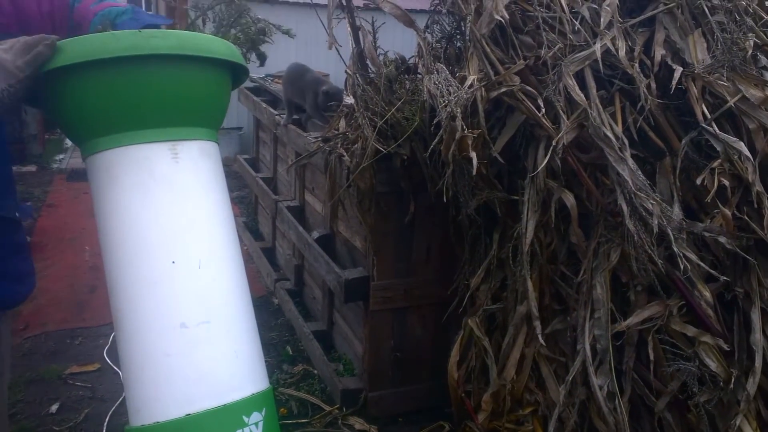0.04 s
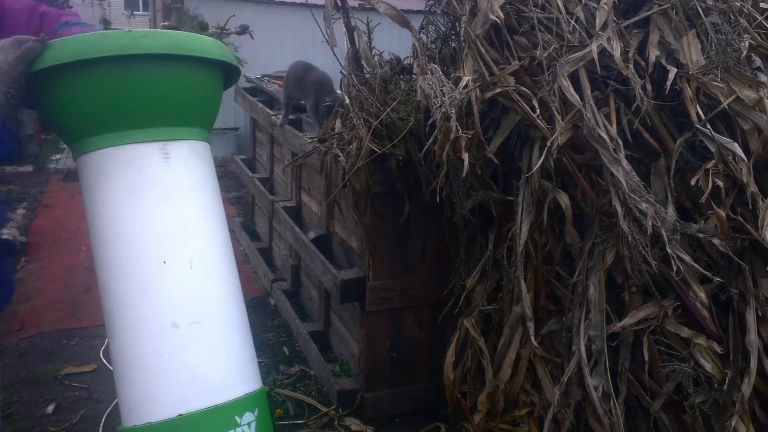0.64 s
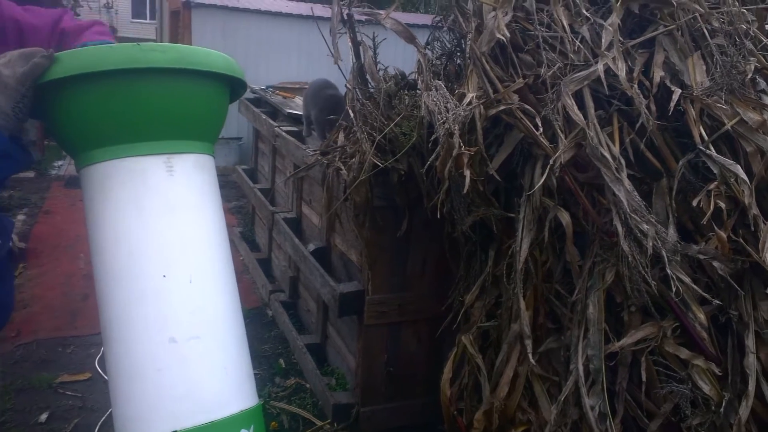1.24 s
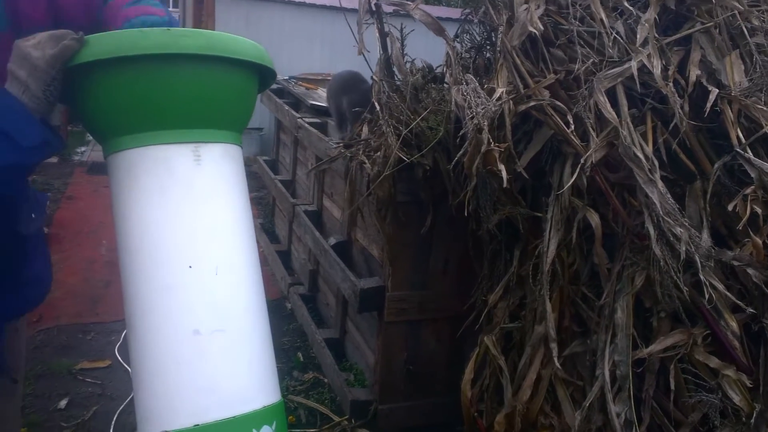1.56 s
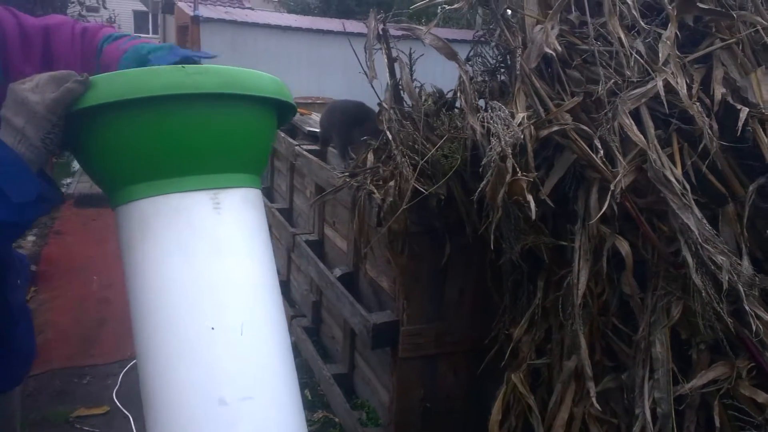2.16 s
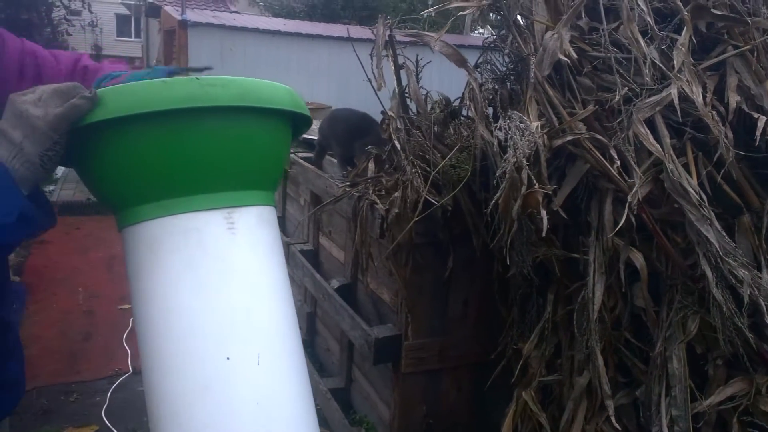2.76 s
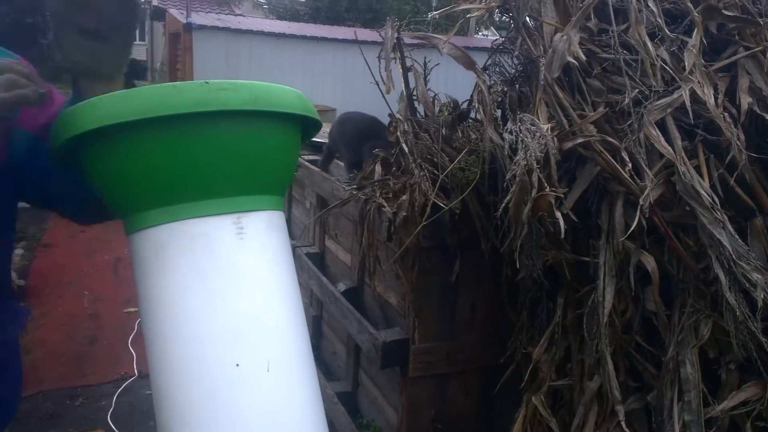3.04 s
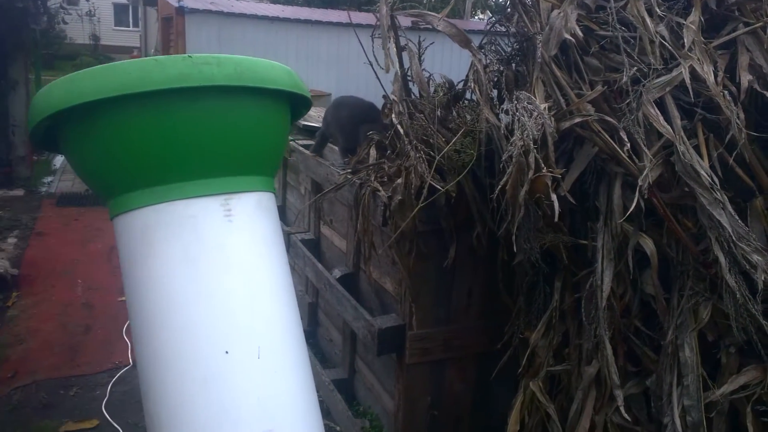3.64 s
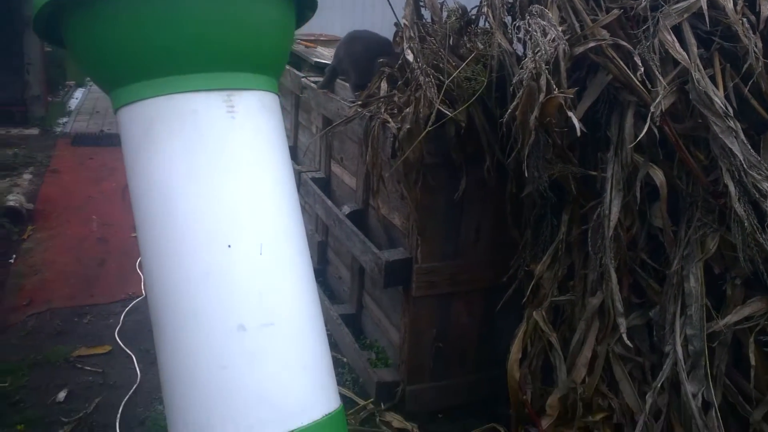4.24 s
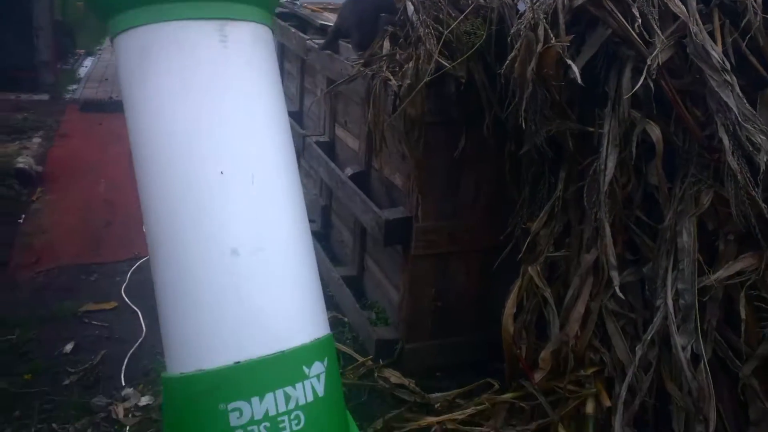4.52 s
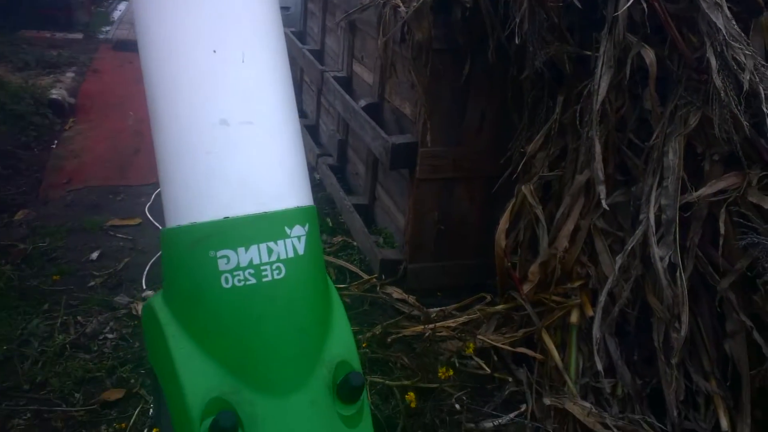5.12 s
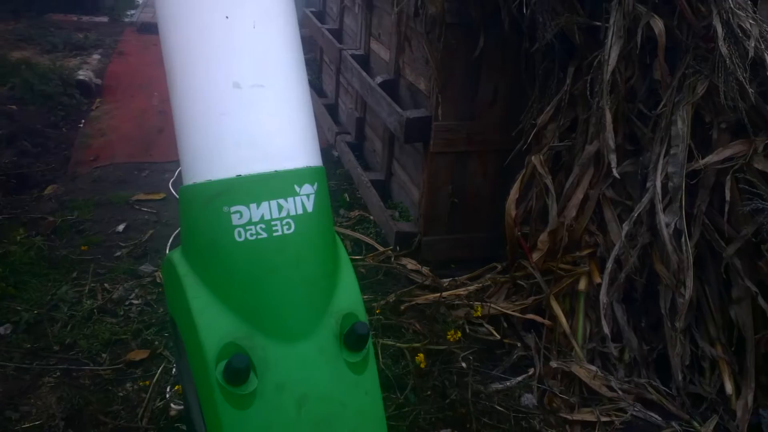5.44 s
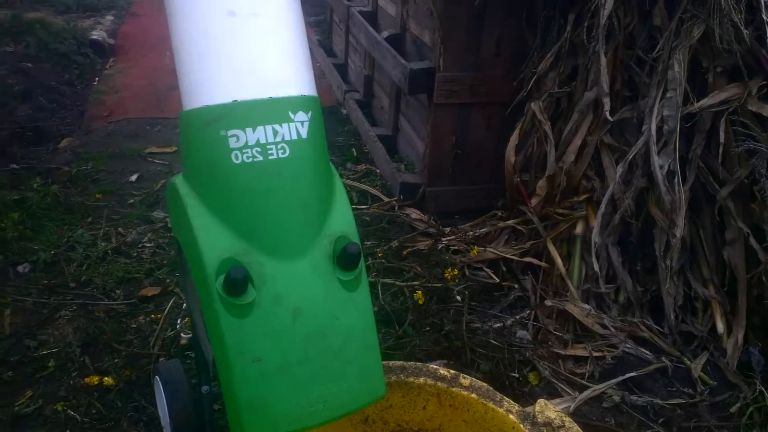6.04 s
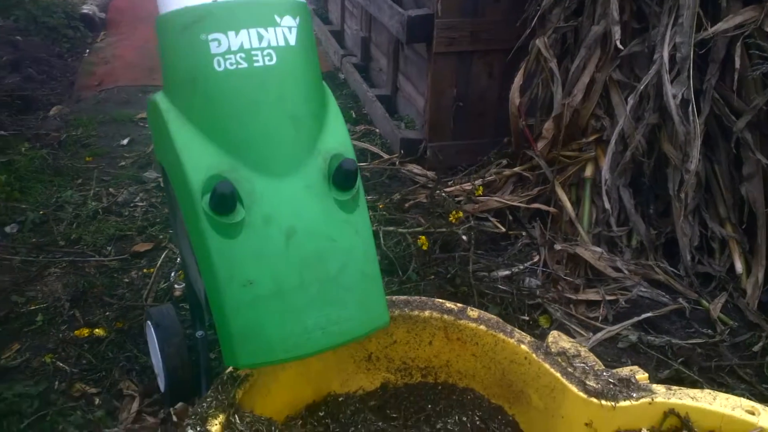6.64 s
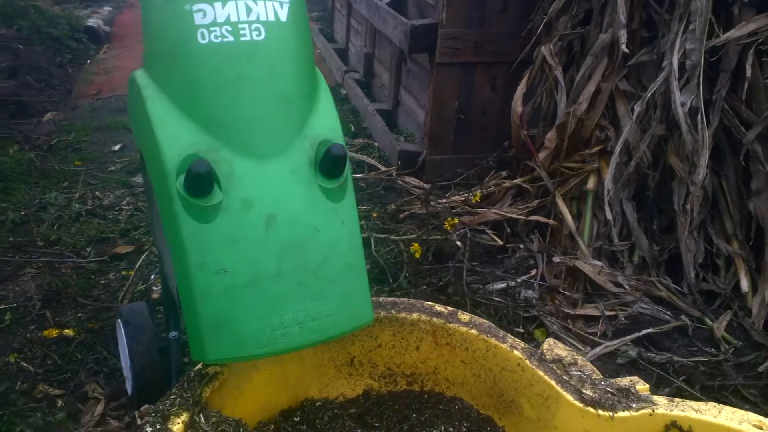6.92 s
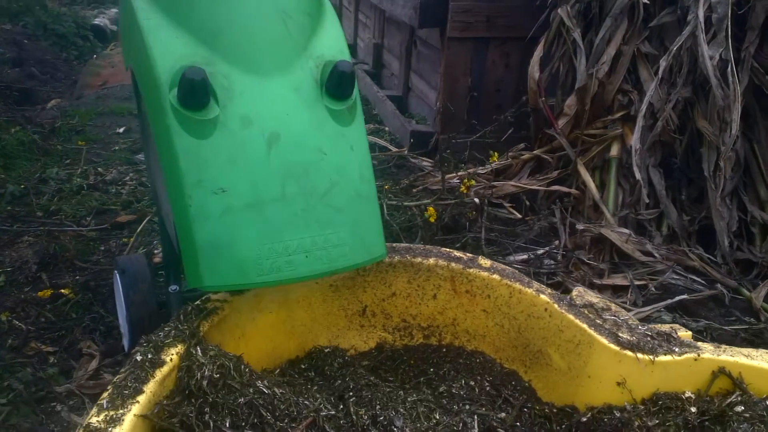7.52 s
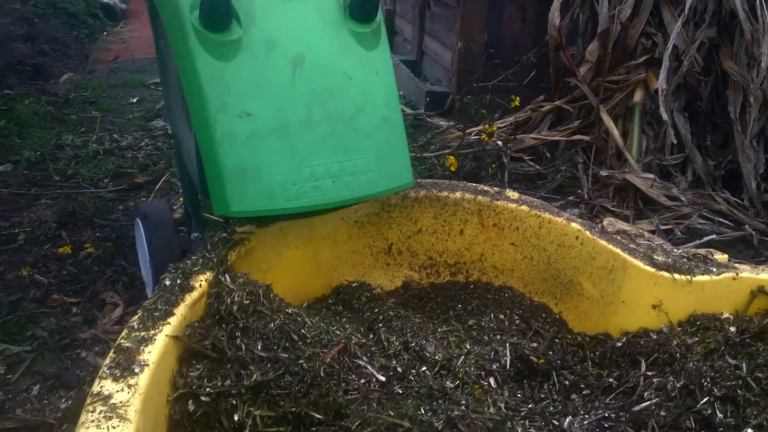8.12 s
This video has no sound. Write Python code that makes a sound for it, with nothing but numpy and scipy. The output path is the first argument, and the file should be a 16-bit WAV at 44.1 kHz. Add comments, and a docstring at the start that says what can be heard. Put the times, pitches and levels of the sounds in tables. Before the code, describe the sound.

An electric garden shredder idles in a yard, humming and blowing air while dry stalks tick lightly in its feed tube. After about two seconds the blades catch and it turns loud: fast hollow knocking, squeaking and crackling, with sharp snaps. The motor sags briefly on a thick bunch, then the chopping settles into a steadier buzz. The close microphone moves down toward the outlet and overloads on the loudest peaks.

```python
"""An electric garden shredder chops dry stalks in a yard, its two blades striking about 94 times a second.
Each pass knocks the housing, squeaks on the stalk and tears fibres. Bites into thick pieces are ragged
and slow the motor; a stalk resting on the blades buzzes evenly. For the first two seconds the machine
only idles, humming and blowing air while stalks tick in its feed tube. The close microphone moves
down to the outlet and overloads on the loudest peaks."""
import sys
import numpy as np
from scipy import signal
from scipy.fft import rfft, irfft
from scipy.io import wavfile
from scipy.ndimage import uniform_filter1d

SR = 44100
rng = np.random.default_rng(int(sys.argv[2]) if len(sys.argv) > 2 else 0)


def dump_mix(stems):
    """Bounce the given channels to the path in sys.argv[1] as a 16-bit WAV at rate SR."""
    frames = np.atleast_2d(stems).T  # one column per channel
    limited = np.clip(frames, -1, 1)  # hard clip at full scale
    pcm = np.round(limited * 32767).astype(np.int16)
    wavfile.write(sys.argv[1], SR, pcm)


N = 365148
TIME = np.arange(N) / SR
IDLE_HZ = 94.2  # blade passes a second with nothing to cut
LOW, MIDDLE, TREBLE = range(3)

# tone colour of air driven through the feed tube: (frequency [Hz], level [dB])
TUBE_COLOUR = [(40, -44), (110, -35), (200, -16), (330, -14), (520, -1), (680, -8), (830, 3.5), (980, -8),
               (1200, 4), (1750, -11), (3100, -3.5), (4800, -15), (10000, -20), (15000, -32)]
# notes the feed tube rings at: (frequency [Hz], width [Hz], boost [dB])
TUBE_MODES = [(1046, 55, 5.5), (2650, 440, 4.5), (3280, 330, 5.5), (6650, 150, 9)]
# tone colour of the cutting chamber heard through the feed tube: (frequency [Hz], level [dB])
CHAMBER_COLOUR = [(60, -47), (200, -27.5), (320, -14.5), (440, -8.5), (640, -7), (800, -6.5), (1400, -2.5),
                  (2100, -9.5), (2700, 1.5), (3350, -0.5), (4000, -10), (5000, -13), (8000, -16.5),
                  (15500, -29.5)]
# notes that ring on that same path: (frequency [Hz], width [Hz], boost [dB])
CHAMBER_MODES = [(361.5, 16, 8.5), (468.6, 33, 15.5), (745, 31, 7), (823, 68, 7.5), (1039.4, 39, 9.5),
                 (1194, 14, 3), (2460, 120, -2), (3475, 120, 2), (6700, 120, 8.5)]
# the microphone's move to the outlet, and the stalk's groan and scrape along the way:
# (time [s], outlet share [capped at 1], groan pitch [Hz], groan level [dB], scrape level [dB])
OUTLET_AND_STALK = [(2.2, 0, 1030, -7, -15), (3.4, 0.03, 1040, -26, -35), (3.7, 0.01, 800, -21, 10),
                    (4.0, 0, 751.5, -5, 1), (4.5, 0.04, 737, -1.5, 0.5), (4.9, 0.23, 750, -32, -1),
                    (5.5, 0.67, 750, -15, -1), (5.8, 0.75, 1040, -11, -12), (6.4, 0.96, 1060, -2, 0),
                    (6.7, 0.8, 800, -1, -1), (7.0, 0.98, 860, 1, -17), (7.5, 1.2, 846, 1, -25),
                    (7.8, 1.02, 924, 1, -17), (8.28, 0.8, 930, 2, -2)]


def undb(db):
    """Turn decibels into a gain."""
    return 10 ** (np.asarray(db) / 20)


def curves(table):
    """The columns of a table, joined by straight lines in time."""
    times, *columns = np.transpose(table)
    return [np.interp(TIME, times, column) for column in columns]


def unit(x):
    """Scale to an average (rms) level of 1; stereo goes by the mean of its sides."""
    return x / np.sqrt(np.mean(np.atleast_2d(x).mean(0) ** 2))


def drift(rate_hz):
    """Smooth random wandering with a spread near 1."""
    hold = int(SR / rate_hz)
    steps = np.repeat(rng.standard_normal(N // hold + 1), hold)
    return 1.279 * uniform_filter1d(uniform_filter1d(steps, hold), hold)[:N]


def pan(x, db):
    """Make the left side louder than the right by db."""
    return x * undb(np.array([[.5], [-.5]]) * db)


def band(x, register):
    """Keep the low, middle or treble part of a sound."""
    # limits of the three registers: (bottom [Hz], top [Hz])
    edges = [(30, 1700), (1700, 4500), (4500, 18000)]
    return signal.sosfilt(signal.butter(4, edges[register], "band", fs=SR, output="sos"), x)


def causal(gain):
    """A filter spectrum with this gain that rings only after a hit (minimum phase)."""
    cepstrum = irfft(np.log(gain))
    size = cepstrum.shape[-1]
    cepstrum[..., 1:] *= 2
    return np.exp(rfft(cepstrum[..., :size // 2], size))


def resonate(x, colour, modes, register, size=4096):
    """A hollow body gives one register of a sound its broad colour and ringing notes."""
    hz = np.maximum(np.arange(size // 2 + 1) * SR / size, 1)
    colour_hz, colour_db = np.transpose(colour)
    db = np.interp(np.log(hz), np.log(colour_hz), colour_db)
    db += sum(boost / (1 + (2 * (hz - centre) / width) ** 2) for centre, width, boost in modes)
    ring = band(irfft(causal(undb(db))), register)
    return signal.oaconvolve(x, ring / np.linalg.norm(ring))[:N]


def reflect(x, wet_db, t60, width, size=8192):
    """Echoes off tube, tub and ground fade 60 dB in t60 seconds; width makes the two sides differ."""
    mid, side = rng.standard_normal((2, size)) * np.exp(-np.log(1000) * TIME[:size] / t60)
    echoes = mid + width * side * np.array([[1], [-1]])
    echoes *= undb(wet_db) / np.linalg.norm(echoes[0])
    echoes[:, 0] += 1  # the direct sound
    paths = rfft(echoes)
    paths *= causal(uniform_filter1d(np.abs(paths) ** 2, size=6) ** -.5)  # keep the broad colour even
    return signal.oaconvolve(x[None], irfft(paths), axes=1)[:, :N]


def fibres(per_second, spread_db):
    """Fibres crack at random, most softly and a few loudly."""
    sizes = undb(spread_db * np.minimum(rng.exponential(size=N), 4))
    return unit(rng.standard_normal(N) * sizes * (rng.random(N) < per_second / SR))


def cracks(table, colour, modes, gain_db, low_db, treble_db, snap, snap_s=0.0021):
    """Each crack is a sharp break and a fading burst of splinters that ring the body around them."""
    drive = np.zeros((3, N))  # loudness over time in each register
    for time, db, low_tilt, treble_tilt, t60 in table:
        start = int(time * SR)
        age = TIME[:SR // 3][:N - start]
        fade = np.exp(-np.log(1000) * age / t60) + snap * np.exp(-age / snap_s)
        tilt_db = np.array([[low_tilt + low_db], [0], [treble_tilt + treble_db]])
        drive[:, start:start + len(age)] += undb(db + tilt_db) * fade
    splinters = fibres(12000, 1.1)
    low, middle, treble = (resonate(splinters * drive[k], colour, modes, k) for k in range(3))
    thud = reflect(low, wet_db=-7, t60=0.08, width=1)
    click = reflect(middle + treble, wet_db=2.8, t60=0.075, width=4.4)
    return pan(undb(gain_db) * (thud + click), 2.9)


def motor_hum(passes):
    """Motor and fan hum at multiples of the shaft's speed; one turn is two blade passes."""
    # motor and fan tones: (multiple of the shaft speed, level [dB])
    tones = [(4, -62), (6, -58), (8, -54), (10, -53.5), (11, -54), (12, -54), (13, -52), (14, -75),
             (18, -61), (20, -96), (24, -53), (26, -49), (31, -66)]
    shaft_angle = np.pi * passes + 0.014 * drift(3.5)
    hum = np.zeros(N)
    for multiple, db in tones:
        peak = np.sqrt(2) * undb(db + 1.3 * drift(6.6))
        hum += peak * np.sin(multiple * shaft_angle + 2 * np.pi * rng.random())
    return hum


def air_rush(passes):
    """The blade disc drives air up the tube, with a slight pulse on each pass."""
    rush = rng.standard_normal(N) * undb(2.04 * drift(14)) * (1 + 0.12 * np.sin(2 * np.pi * passes))
    low, middle, treble = (resonate(rush, TUBE_COLOUR, TUBE_MODES, k) for k in range(3))
    roar = undb(-35.5) * unit(reflect(low, wet_db=-0.44, t60=0.12, width=0.75))
    hiss = reflect(undb(-40) * middle + undb(-52.5) * treble, wet_db=1, t60=0.13, width=1)
    return roar + hiss


def stalk_taps():
    """Loose stalks tap and scrape the feed tube."""
    # taps: (time [s], relative level [dB], low tilt [dB], treble tilt [dB], fade time [s])
    taps = [(0.2223, -19, -14, -3, 0.045), (0.3176, -18, -16.5, -8, .1), (0.3863, -14.5, -20, -11, 0.32),
            (0.5296, -21, -26, -17, .14), (0.605, -23.5, -13, -9.5, 0.19), (0.744, -15, -27, -18, 0.09),
            (0.8164, -20, -17, -19, .13), (0.976, -16, -13, -15, .09), (1.162, -26, 8, -24, 0.32),
            (1.204, -18, -16, -12.5, .19), (1.2475, -18, -6, -19, .12), (1.3333, -17, -18, -12, 0.21),
            (1.4185, -10, -13, -7, .08), (1.4645, -20, -15, -21, 0.32), (1.5279, -14.5, -2, -14, 0.15),
            (1.5456, -11.5, -22, -15, 0.12), (1.5945, -13, -8, -14, 0.13), (1.722, -16.5, -25, -12, 0.1)]
    return cracks(taps, TUBE_COLOUR, TUBE_MODES, gain_db=-10.5, low_db=1.5, treble_db=0, snap=0.39)


def stalk_snaps(fade_s=0.044):
    """Stalks snap under the blades and ring the chamber."""
    # snaps: (time [s], relative level [dB], low tilt [dB], treble tilt [dB])
    snaps = [(2.117, -11.5, -6, -18), (2.152, -2.5, -1.5, -22), (2.1655, -2.5, -6, -26),
             (2.2272, -4, -15, -27), (2.2492, -6, 0, -25), (2.2683, 2, -19, -12), (2.371, -3, -10, -5),
             (2.497, 4, -9.5, -21), (2.5742, 3, -5.5, -13), (2.6157, -2, -16, -19), (2.9828, 2, -19, -12.5),
             (3.2261, -6.5, -2, -6), (3.262, 4, -24, -29), (3.3553, 1, -12, -18), (3.413, -3.5, -24, -15),
             (3.4458, -3.5, -17, -16), (3.47, -4, -27, -15), (3.562, 0.5, -11, -9), (3.6754, -4, -9, -14),
             (3.789, -1, -9, -15), (3.9596, -9, -8, -8), (4.035, 2.5, -8, -19), (5.223, 5, -12, -17),
             (5.4053, 5, -11, -20), (5.4143, -6, -2, -5)]
    rows = [(*row, fade_s) for row in snaps]
    return cracks(rows, CHAMBER_COLOUR, CHAMBER_MODES, gain_db=-10, low_db=2, treble_db=6.5, snap=0.89)


def blade_load(attack_s=0.016, release_s=0.024):
    """Bites into thick pieces briefly add loudness and raggedness to the steady feed."""
    # steady push of stalks on the blades: (time [s], knock [dB], squeak [dB], crackle [dB])
    feed = [(2.03, -35.5, -36.0, -49), (2.22, -22, -22, -38), (2.27, -23, -11.5, -20.5),
            (2.63, -18.5, -12, -21.5), (2.89, -19.0, -13.5, -27.5), (3.1, -23.5, -16.5, -29),
            (3.41, -27, -22.5, -31), (3.62, -20, -17, -26), (4.01, -15.5, -15.5, -22),
            (4.32, -21.5, -13.0, -25.5), (5.1, -18.5, -16.5, -26.5), (5.72, -22.5, -14.5, -30.5),
            (6.51, -18.5, -14.0, -31.5), (6.94, -18.5, -12, -25.5), (7.48, -17.5, -15, -26),
            (7.74, -22.5, -21, -27.5), (7.86, -19.0, -16.5, -22.5), (8.28, -17, -18.5, -30)]
    # fresh stalks tumble, then settle and rub evenly: (time [s], raggedness [0-1])
    settling = [(2.22, 0.93), (2.32, 0.46), (3.45, 0.71), (3.9, 0.4), (4.25, 0.05), (5.5, 0.02),
                (8.28, .02)]
    # bites: (time [s], length [s], added knock [dB], added tearing [dB], added raggedness [0-1])
    bites = [(2.087, 0.031, 7, 3, 1), (2.139, 0.048, 6, 4, 1), (2.244, 0.097, 9.5, 0.5, 0.29),
             (2.351, 0.048, 4.5, 1.5, 0.26), (2.439, 0.072, 2.5, 0, 0.6), (2.656, 0.033, 5, 0.5, 0.43),
             (2.737, 0.067, 6.5, 0, 0.21), (2.838, 0.042, -1.5, 1.5, 0), (2.928, 0.061, 5.5, 1, 0.18),
             (3.002, 0.034, 11, 3, 0.2), (3.499, 0.055, 8.5, 5.5, 0.44), (3.602, 0.045, 10.5, 5.5, 0.55),
             (3.69, 0.025, 7, 2.5, 0.45), (3.781, 0.043, 0, 1, 0.2), (3.887, 0.067, 3.0, 2.5, 0.36),
             (4.25, 0.071, 2, 1, 0.02), (4.4, 0.056, 3, 1.5, 0.02), (4.579, 0.097, 2, 1.5, 0.04),
             (4.945, 0.143, 4.5, 1.5, 0.62), (5.057, 0.026, 1.5, 3, 0.13), (5.121, 0.029, 6, 2, 0.33),
             (5.28, 0.019, 3, 4.5, 0.05), (6.568, 0.18, 2.5, 1.5, 0.02), (6.928, 0.046, 3.5, 0.5, 0.01),
             (7.14, 0.047, 3.5, 0, 0.12), (7.489, 0.075, 5, 1.5, 0.08), (7.628, 0.064, 5.5, 4.5, 0.09)]
    knock_db, squeak_db, crackle_db = curves(feed)
    ragged = curves(settling)[0]
    for start, length, push_db, tear_db, rough in bites:
        grip = np.clip(np.minimum((TIME - start) / attack_s, 1 + (start + length - TIME) / release_s), 0, 1)
        knock_db += push_db * grip
        squeak_db += tear_db * grip
        crackle_db += tear_db * grip
        ragged += rough * grip
    return knock_db, squeak_db, crackle_db, np.clip(ragged, 0, 1)


def follow_load(x, db, sides, first_stalk_s=2.03):
    """Set a cutting sound's level and side: silent until fed, dipping when the blades run free."""
    # the blades lose the stalk: (time [s], length [s], dip [dB])
    gaps = [(2.137, 0.036, -6), (2.216, 0.032, -1.5), (2.243, .012, -1.5), (2.595, 0.031, -14),
            (2.804, 0.041, -4), (3.102, .05, -5), (3.325, 0.042, -2), (3.396, .026, -5.5),
            (3.757, 0.02, -7.5), (3.979, 0.035, -3), (4.523, 0.072, -2.5), (5.115, 0.022, -1.5),
            (5.445, 0.033, -21), (7.218, 0.056, -2.5)]
    dip_db = sum(depth * np.exp(-(2 * (TIME - time) / length) ** 4) for time, length, depth in gaps)
    fed = np.interp(TIME, [first_stalk_s, first_stalk_s + 0.021], [0, 1])
    power = uniform_filter1d(x.mean(0) ** 2, round(3 * SR / IDLE_HZ))  # over about three passes
    return pan(x * fed * undb(db + dip_db) / np.sqrt(power + 1e-9), curves(sides)[0])


def stalk_squeak(age, force, pitch_hz, swell_s, glide):
    """The blade drags over the stalk: a short rising tone swells and dies within each pass."""
    t = age - 2 * swell_s
    swell = np.exp(-(t / swell_s) ** 2) * np.tanh(2 * age / swell_s)
    return unit(force * swell * np.sin(2 * np.pi * pitch_hz * t * (1 + glide * t)))


def shrill_scrape(tearing, db, pitch_hz=6620):
    """Dry stalk skin scraping on steel sings in a narrow band."""
    scrape = signal.lfilter(*signal.iirpeak(pitch_hz, 13, fs=SR), tearing * fibres(6000, 3.4))
    return undb(db + 2 * drift(13)) * unit(band(scrape, TREBLE))


def chamber(blows, torn, ragged, outlet, register, chips):
    """Blows, torn fibres and loose chips ring the chamber, heard through feed tube and outlet."""
    # tone colour of the chamber heard through the outlet: (frequency [Hz], level [dB])
    outlet_colour = [(90, -54), (270, -28.5), (350, -12), (520, -0.5), (800, -1.5), (1250, 0), (1500, -9),
                     (1900, -6.5), (2350, -3.5), (3250, 0), (3900, -8.5), (5300, -19), (9500, -21.5),
                     (15500, -41)]
    # notes the outlet rings at: (frequency [Hz], width [Hz], boost [dB])
    outlet_modes = [(381, 19, 9), (470, 26, 8), (644.4, 49, 2), (804, 42.9, 7), (850, 40, 2.5),
                    (1012.6, 23, 4), (1930, 160, 0.5), (2334, 46, 10), (2534, 31, 10), (3160, 99, -10),
                    (3243, 66, 6.5), (4130, 120, 5)]
    drive = np.sqrt(1 - ragged) * blows + np.sqrt(ragged + chips) * unit(torn)
    via_tube = resonate(drive, CHAMBER_COLOUR, CHAMBER_MODES, register)
    via_outlet = resonate(drive, outlet_colour, outlet_modes, register)
    share = np.clip(outlet, 0, 1)
    return (1 - share) * via_tube + share * via_outlet


def strikes(passes, force):
    """One click each time the pass count reaches a whole number, shared between two samples."""
    place = np.interp(np.arange(1, int(passes[-1])), passes, np.arange(N))
    i = np.minimum(place.astype(int), N - 2)
    late = place - i
    return np.bincount(i, force[i] * (1 - late), N) + np.bincount(i + 1, force[i] * late, N)


def blade_blows(passes, rate_hz, ragged, uneven_db=3.0, blade_db=1.47, bounce=0.48, slip=0.0463):
    """The blades hit a bouncing stalk; the more ragged the feed, the less alike the passes are."""
    contact = np.maximum(passes + slip * ragged * drift(60), 0)
    count = contact.astype(int)
    age = (contact - count) / rate_hz  # seconds since this pass began
    sharpness_db = blade_db * (-1) ** count  # one blade is sharper than the other
    force = undb(uneven_db * ragged * rng.standard_normal(N // 100)[count] + sharpness_db)
    # the stalk bounces between passes, at moments that drift as it wears down
    bounces = sum(strikes(contact + rng.random() + 0.03456 * drift(1.2), force) for _ in range(4))
    return unit(strikes(contact, force) + bounce * bounces), force, age


def cutting(passes, rate_hz):
    """Every blade pass makes a low knock, a squeak and a crackle of tearing fibres."""
    # stalk rubbing on the blade: (time [s], squeak pitch [Hz], relative level [dB])
    rubbing = [(2.1, 3050, -1), (2.32, 3080, 1.5), (3.48, 2990, -2), (3.62, 2900, -7), (3.82, 3270, -7),
               (4.09, 2869, -3.5), (4.44, 2970, -2.5), (4.55, 3055, -12), (4.8, 3180, -6), (5.19, 2820, -9),
               (5.47, 2664, -9), (5.66, 2510, 0.5), (6.36, 2816, 0), (6.82, 3014, .5), (7.08, 2864, -1),
               (7.32, 2890, -6), (8.28, 3050, -4)]
    # where each sound sits between the ears: (time [s], left minus right [dB])
    knock_sides = [(2.1, -5), (2.72, -1.5), (5.15, -4.5), (5.58, 4), (6.49, -4.5), (7.19, -1.5), (8.28, -1)]
    squeak_sides = [(2.1, 10), (2.29, 4), (3.51, 7.5), (3.86, -6), (3.89, 8), (4.01, -4), (4.04, 7.5),
                    (4.92, 0.5), (5.01, 8), (5.09, 0.0), (5.32, 5.5), (6.37, 10.5), (6.83, 1.0),
                    (7.13, 5.5), (8.25, 6), (8.28, 15)]
    crackle_sides = [(2.1, 2), (2.25, -0.5), (3.32, 2), (3.87, -7.5), (4.37, 3.5), (4.58, -4), (6.42, 7),
                     (6.51, -0.5), (7.32, 7), (8.28, 1)]
    knock_db, squeak_db, crackle_db, ragged = blade_load()
    rub_hz, rub_db = curves(rubbing)
    outlet, groan_hz, groan_db, scrape_db = curves(OUTLET_AND_STALK)
    blows, force, age = blade_blows(passes, rate_hz, ragged)
    tearing = force * (1.05 + 0.82 * np.exp(-((age - .003) / 0.0023) ** 2))  # most as the edge sinks in
    even = np.sqrt(1 - ragged)

    # the bent stalk itself groans once a pass
    groan = even * undb(groan_db) * stalk_squeak(age, force, groan_hz, swell_s=0.00258, glide=1.5)
    low = chamber(blows, tearing * fibres(3500, 1.26), ragged, outlet, LOW, chips=0.52)
    knock = reflect(low + groan, wet_db=-2, t60=0.095, width=1.16)

    rub = even * undb(rub_db) * stalk_squeak(age, force, rub_hz, swell_s=0.00125, glide=45)
    middle = chamber(blows, tearing * fibres(3000, 0.97), ragged, outlet, MIDDLE, chips=0.41)
    squeak = reflect(middle, wet_db=11, t60=0.095, width=1.11)
    squeak += 1.67 * reflect(rub, wet_db=1, t60=0.034, width=2)

    scrape = shrill_scrape(tearing, scrape_db)
    treble = chamber(blows, tearing * fibres(1500, 2.5), ragged, outlet, TREBLE, chips=1)
    crackle = reflect(treble + scrape, wet_db=9, t60=0.075, width=0.92)
    return (follow_load(knock, knock_db, knock_sides)
            + follow_load(squeak, squeak_db, squeak_sides)
            + follow_load(crackle, crackle_db, crackle_sides))


def scene():
    """One shaft drives the hum, the air and the cutting, while stalks tap and snap."""
    # blade speed under load, slowest in the thickest bunch: (time [s], pass rate [Hz])
    speed = [(2.2, 93.8), (2.47, 91.7), (2.59, 94.2), (2.7, 92.66), (3.0, 93.45), (3.37, 94.32),
             (3.57, 93.2), (3.72, 87.37), (3.9, 89.37), (4.03, 89.3), (4.22, 93.17), (4.95, 93.55),
             (5.11, 91.57), (5.26, 93.15), (5.58, 93.75), (6.5, 93.5), (7.75, 93.6), (8.28, 93.85)]
    rate_hz = np.where(TIME < speed[0][0], IDLE_HZ, curves(speed)[0])
    passes = np.cumsum(rate_hz) / SR  # running count of blade passes
    stalks = stalk_taps() + stalk_snaps()
    motor = pan(motor_hum(passes) + air_rush(passes), 0.92)
    return motor + stalks + cutting(passes, rate_hz)


def record(dry, ceiling=0.9, knee=12, top_hz=15700):
    """The microphone flattens the loudest peaks, and the highest treble is cut."""
    clipped = dry / (1 + np.abs(dry / ceiling) ** knee) ** (1 / knee)
    return signal.sosfilt(signal.ellip(8, .2, 70, top_hz, fs=SR, output="sos"), clipped)


dry = scene()
out = record(dry)
dump_mix(out)
```